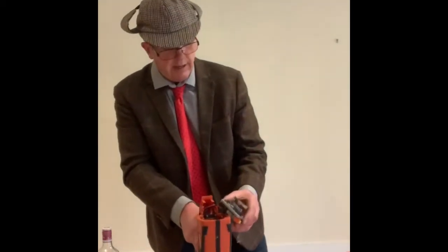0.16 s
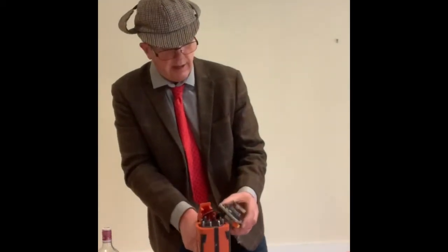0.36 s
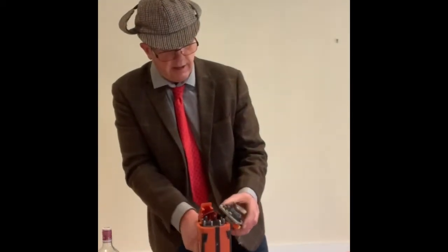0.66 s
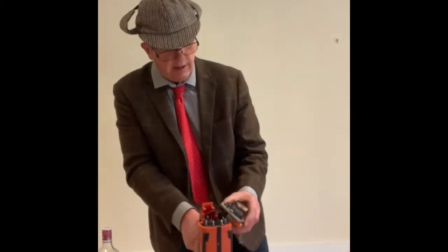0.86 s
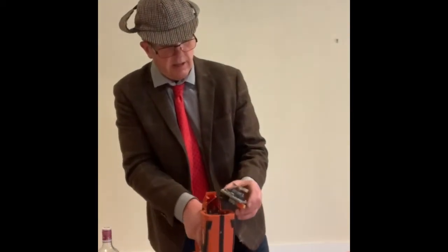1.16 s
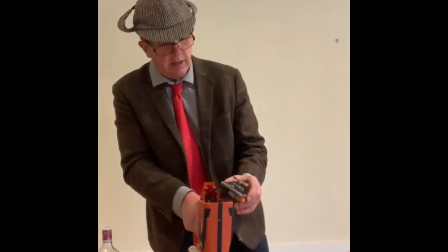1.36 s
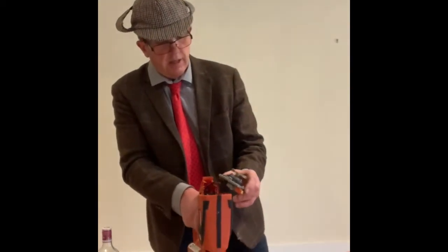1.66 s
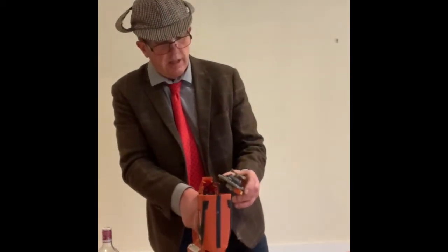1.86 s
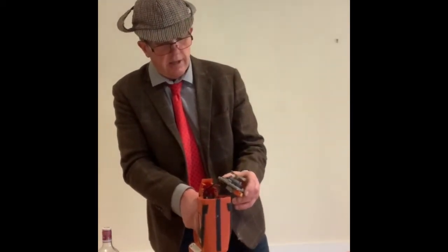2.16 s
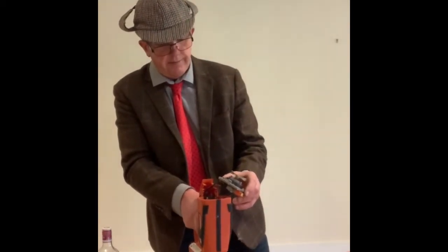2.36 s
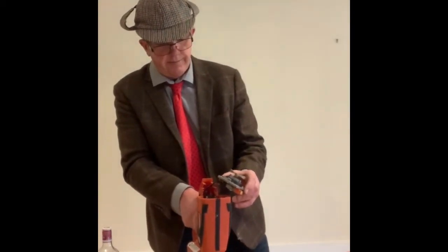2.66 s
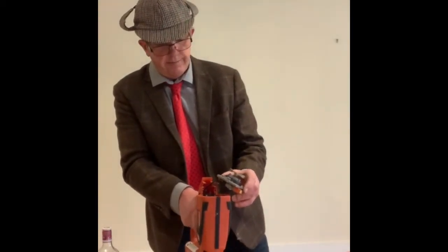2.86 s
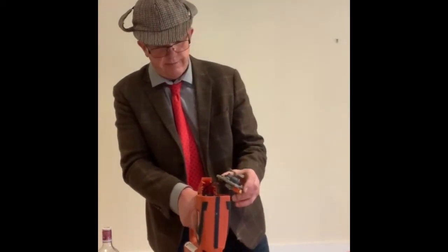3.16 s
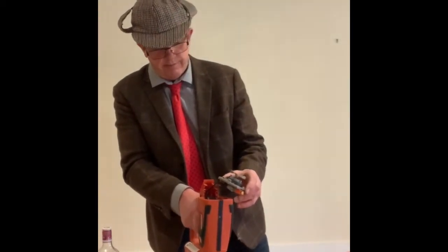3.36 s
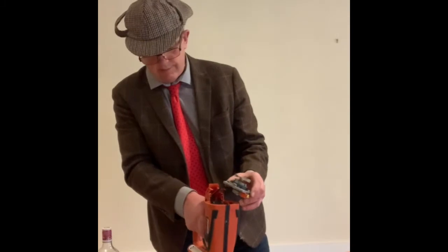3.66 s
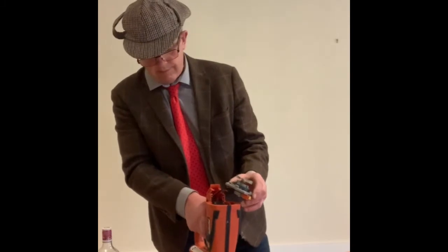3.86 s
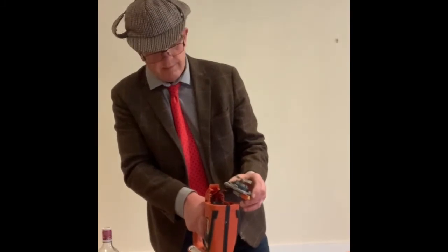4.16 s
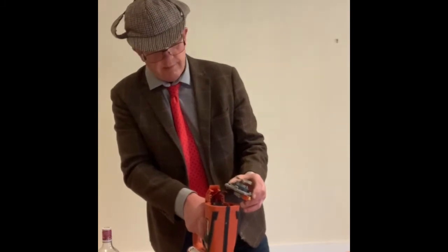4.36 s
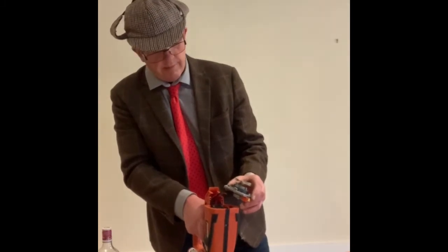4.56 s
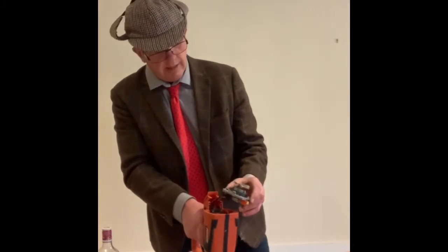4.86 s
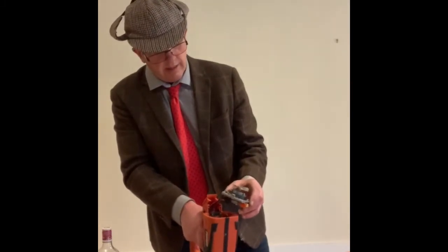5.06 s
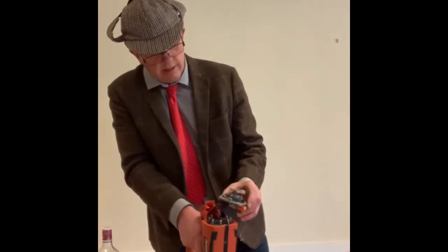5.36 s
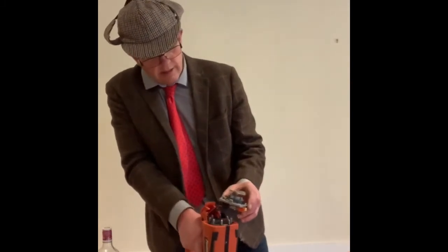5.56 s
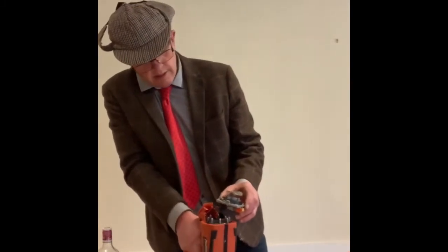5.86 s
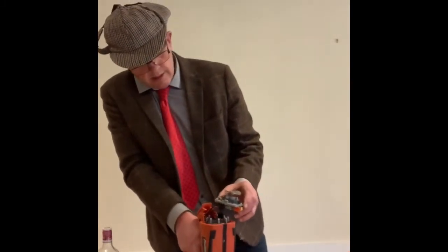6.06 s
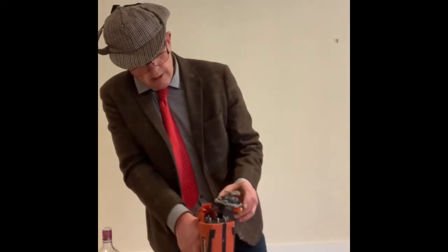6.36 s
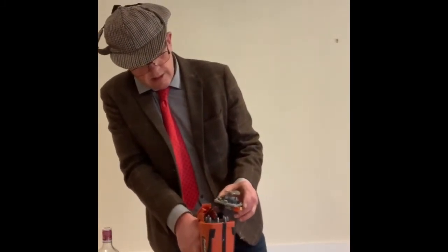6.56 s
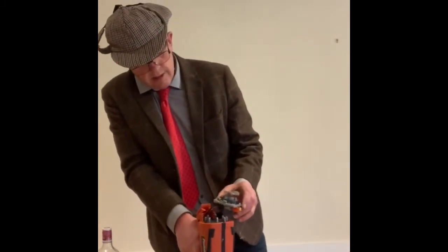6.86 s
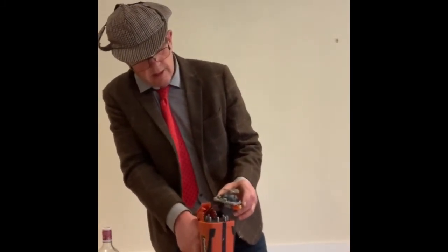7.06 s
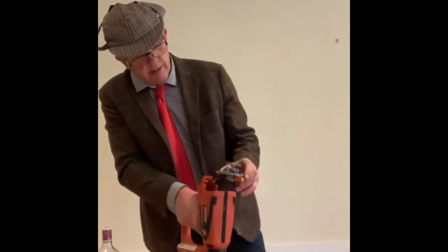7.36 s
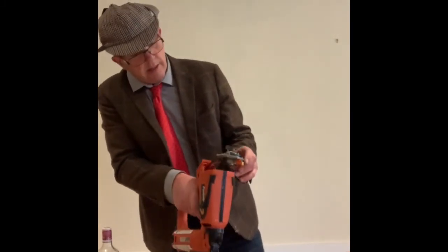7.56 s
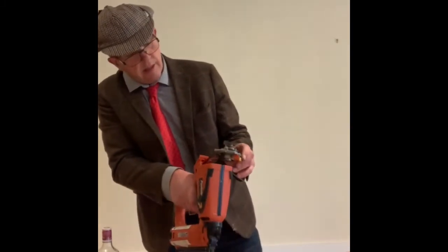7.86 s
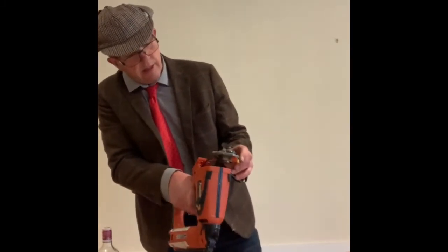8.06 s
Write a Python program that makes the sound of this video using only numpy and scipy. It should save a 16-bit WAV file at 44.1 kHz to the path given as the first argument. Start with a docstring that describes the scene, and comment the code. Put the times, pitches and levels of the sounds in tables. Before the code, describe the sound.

A gas nail gun's small fan is already at full speed: a steady blade tone near 790 Hz, thin higher whines and a bright hissing air rush, slightly wavering. Handling scrapes start immediately; at 0.25 s a heavy, dull floor thump lands with a sharp crack. A smaller clatter of clicks comes around 1.0 s and one short tick at 2.0 s. At 4.0 s power drops: the pitch glides down and the air darkens and fades, while dry, scratchy bearing rubbing surfaces until about 4.7 s. A click at 4.95 s and thumps, scrapes and knocks from 5.1 to 5.4 s break the near quiet. At 5.4 s the motor climbs rapidly, settling by about 6 s into the same whine. Scrapes near 7 s lead to a tight, sharp click cluster at 7.15 s; the fan continues to the end, around 8 s. Bare room, light reverberation, soft hiss, close stereo leaning right.

```python
"""The four-blade fan motor of a gas nail gun whines in a bare room: shaft orders in a rush of air through the housing.
Scrapes, floor thumps and tool clicks from the first moments on; after 4 s the fan coasts and a dry bearing shows.
Handling returns near 5 s and again near 7 s; in between, at 5.4 s, the motor spins up again.
Sines make the orders, shaped noise the air and rubbing, rung modes the blows; two microphones hear it from the right.
"""
import sys
import numpy as np
from scipy import signal
from scipy.fft import rfft, irfft, next_fast_len
from scipy.io import wavfile

SR = 44100
rng = np.random.default_rng(int(sys.argv[2]) if len(sys.argv) > 2 else 0)


def materialize(psi):
    """Save the field psi as 16-bit PCM at rate SR to the path in sys.argv[1].

    A 1-D psi becomes a single channel; in a 2-D psi each row is a channel.
    """
    bounded = np.clip(np.atleast_2d(psi).T, -1, 1)
    quanta = np.round(bounded * 32767).astype(np.int16)
    wavfile.write(sys.argv[1], SR, quanta)


N = 361619

FULL_HZ, SECOND_HZ = 197.6, 196.9  # shaft speed before the coast and after the spin-up
# Housing resonances. Each row: centre in Hz, width in Hz, lift in dB.
HOUSING_MODES = [(1125, 80, 16), (1600, 200, 7), (1850, 200, 10), (7690, 470, 4.5)]


def gain_of(db):
    """dB to gain."""
    return 10 ** (np.asarray(db) / 20)


def evened(x):
    """Scales to rms 1."""
    return x / np.sqrt(np.mean(x ** 2) + 1e-20)


def read(points, hz):
    """Reads a spectrum table on a log-frequency axis."""
    f, value = np.transpose(points)
    return np.interp(np.log(hz + 1), np.log(f + 1), value)


def read_linear(points, x):
    """Reads a two-column table on a linear axis."""
    return np.interp(x, *np.transpose(points))


def humps_db(modes, hz):
    """Resonant lift in dB of (Hz, width in Hz, dB) modes."""
    return sum(db / (1 + (2 * (hz - f) / width) ** 2) for f, width, db in modes)


def add(mix, s, sound):
    """Mixes a sound in at s seconds."""
    part = mix[:, round(s * SR):][:, :sound.shape[1]]
    part += sound[:, :part.shape[1]]


def drift(x, rate):
    """Random wander of rms 1 along x: sines of up to rate cycles per unit of x, the slow ones strongest."""
    return evened(sum(np.sin(2 * np.pi * (f * x + rng.random())) / np.sqrt(f)
                      for f in np.geomspace(rate / 20, rate, 12)))


def coarse_drift(t, rate_hz):
    """Drift computed at every 64th sample and interpolated."""
    return np.interp(t, t[::64], drift(t[::64], rate_hz))


def noise(length, db_of, size=1024):
    """Two unrelated noises whose short-time spectra follow db_of(Hz column, s row)."""
    frames = 4 * length // size + 5
    hz = np.fft.rfftfreq(size, 1 / SR)[:, None]
    a, b = rng.standard_normal((frames, len(hz), 2, 2)).T
    z = (a + 1j * b) * gain_of(db_of(hz, np.arange(frames) * size / 4 / SR))
    return signal.istft(z, nperseg=size, noverlap=3 * size // 4)[1][:, :length]


def microphones(pair):
    """The right leads; left-right likeness varies from band to band."""
    # Each row: Hz, left-right likeness from 0 to 1.
    likeness = [(100, 0.94), (1000, 0.97), (1500, 0.92), (2400, 0.021), (3400, 0.72), (4000, 1), (4900, 1),
                (5500, 0.78), (6500, 0.39), (7600, 0.94), (8600, .999), (9700, 0.95), (10700, 0.68),
                (11900, .999), (13800, .999), (15000, 0.44)]
    # Each row: Hz, phase in radians by which left leads.
    left_lead_rad = [(0, 0), (350, -.1), (780, -.9), (1640, -.5), (2400, -2.1), (3800, -np.pi),
                     (5000, -np.pi), (7600, -2 * np.pi), (9600, -2 * np.pi), (11700, -3 * np.pi),
                     (14000, -3 * np.pi), (16000, -4 * np.pi)]
    # Each row: Hz, left minus right in dB.
    tilt_db = [(300, 2), (3400, -2.5), (4300, 0)]
    size = next_fast_len(N + 4096)
    hz = np.fft.rfftfreq(size, 1 / SR)
    same = np.clip(read(likeness, hz), 0, 1)
    side = np.array([[.5], [-.5]])
    a, b = rfft(pair, size)
    ports = np.exp(1j * side * read_linear(left_lead_rad, hz)) * gain_of(side * read(tilt_db, hz))
    right = same * a + np.sqrt(1 - same ** 2) * b
    return irfft(np.array([a, right]) * ports, size)[:, :N]


def shaft_hz(t):
    """Full speed, a coast in which drag eats the speed, then steady torque against rising drag."""
    off_s, coast_s = 4.0, 0.765  # power drops; time constant of the coast
    on_s, spin_up_s = 5.377, 0.21  # power returns; time constant of the climb
    coast = FULL_HZ * np.exp(-(np.clip(t, off_s, on_s) - off_s) / coast_s)
    climb = np.tanh(np.arctanh(np.minimum(coast / SECOND_HZ, .99)) + (t - on_s) / spin_up_s)
    return np.where(t < on_s, coast, SECOND_HZ * climb)


def log_speed(t):
    """Decades of shaft speed relative to full speed."""
    return np.log10(shaft_hz(t) / FULL_HZ)


def tone(turns):
    """A sine and its quarter-cycle twin, each of rms 1."""
    return np.sqrt(2) * np.array([np.sin(2 * np.pi * turns), np.cos(2 * np.pi * turns)])


def blade(t, hz, turns):
    """The blade tone meets its echoes from the walls, so a glide runs through a row of dips."""
    # Level for full speed, without echoes. Each row: time in seconds, level in dB.
    level_rows = [(0, -49), (.5, -56), (1.1, -51.5), (2.15, -54), (2.65, -54), (3.05, -52.5), (3.43, -54.5),
                  (3.53, -62), (3.68, -64), (3.73, -78), (3.8, -63), (3.95, -65), (4.0, -80), (4.04, -52.5),
                  (5.76, -54.5), (5.88, -61.5), (6.1, -56), (7.9, -53.5), (7.99, -60), (8.1, -56.5)]
    # Wall echoes. Each row: delay in seconds, level in dB.
    wall_rows = [(0.0213, -7), (0.0347, -9)]
    # Side it is heard on. Each row: time in seconds, left minus right in dB, on top of the microphones.
    pan_rows = [(0, -1.5), (3.4, -3.5), (3.6, 12), (4.2, -3), (6, 1), (8.2, 5)]
    db_per_decade, waver_db = 83, 1.5
    db = read_linear(level_rows, t) + db_per_decade * np.log10(hz / FULL_HZ)
    db += waver_db * coarse_drift(t, rate_hz=12)
    # an echo lags by the turns made during its delay
    echoes = sum(gain_of(wall_db) * tone(4 * (turns - shaft_hz(t - s / 2) * s)) for s, wall_db in wall_rows)
    heard = gain_of(db) * microphones(tone(4 * turns) + echoes)
    return heard * gain_of(np.outer([.5, -.5], read_linear(pan_rows, t)))


def whine(t, hz, turns):
    """Shaft orders weaken as the speed drops, the high ones most, and lift at the housing resonances."""
    # Orders that swell and fade, each in its own way.
    # Each row: time in seconds, then the 6th, 8th, 12th and 39th order in dB.
    swelling_rows = [(0.55, -75, -79, -69, -74), (0.85, -82, -79, -71, -71), (1.3, -74, -66, -67, -74),
                     (1.65, -81, -76, -72, -72), (2.1, -81, -73, -70, -72), (2.45, -73, -66, -82, -66),
                     (2.8, -74, -70, -80, -70), (3.15, -78, -68, -72, -83), (3.5, -71, -69, -74, -79),
                     (3.85, -71, -66, -72, -77), (6.0, -68, -61, -86, -66), (6.35, -69, -70, -86, -67),
                     (6.7, -69, -67, -75, -64), (6.98, -67, -69, -74, -71), (7.4, -72, -64, -73, -79),
                     (7.7, -73, -74, -69, -70), (8.05, -73, -78, -63, -76)]
    # Other orders at full speed. Each row: multiple of the shaft speed, level in dB.
    steady_rows = [(1, -81.5), (5, -74.5), (7, -86), (16, -71.5), (17, -71.5), (20, -64.5), (22, -68.5),
                   (27, -69.5), (28, -72), (32, -74.5)]
    # The 9th order swells after 7 s, then fades a little. Each row: time in seconds, level in dB.
    ninth_rows = [(7.0, -85), (7.4, -75), (8.05, -80)]
    odd_lift_db = 13  # 7th and 9th stand out while the speed changes
    coarse, coarse_hz = t[::64], hz[::64]
    slowing = np.log10(coarse_hz / FULL_HZ)
    gliding = np.clip(-60 * slowing - .2, 0, 1)
    s, *swelling = np.transpose(swelling_rows)
    # (order, level dB, waver dB)
    levels = [(k, np.interp(coarse, s, db), 2.5) for k, db in zip((6, 8, 12, 39), swelling)]
    levels += [(9, read_linear(ninth_rows, coarse), 2.5)]
    levels += [(k, db, 2.5 if k < 12 else 5) for k, db in steady_rows]
    out = np.zeros(N)
    for k, db, waver_db in levels:
        lift_db = humps_db(HOUSING_MODES, k * coarse_hz) - humps_db(HOUSING_MODES, k * FULL_HZ)
        lift_db += odd_lift_db * gliding * (k in (7, 9))
        # a gliding tone runs through the peaks and dips of the room: drift along pitch
        lift_db += gliding * (7 * np.clip(drift(k * coarse_hz, rate=.3), -2.5, 1) - 4)
        speed_db = (40 + .3 * k ** 2) * slowing
        size = gain_of(db + speed_db + lift_db + waver_db * drift(coarse, rate=22))
        out += np.interp(t, coarse, size) * np.sqrt(2) * np.sin(2 * np.pi * (k * turns + rng.random()))
    return out


def air_rush(t, turns):
    """Noise of air through the housing throbs once a turn; slower blades stir less treble."""
    # Spectrum at full speed, before the housing resonances. Each row: Hz, dB.
    spectrum = [(1800, -26.5), (2600, -10.5), (3300, -1), (4300, 3.5), (5500, 1.5), (6500, -2.5),
                (9000, -5), (10500, -9.5), (12500, -15.5), (15700, -10.5)]
    level_db, bend_db = -53.5, -125  # at full speed; per squared decade, so its fall steepens
    flutter_db = 6  # unevenness per decade of lost speed

    def colour_db(f, u):
        slowing = log_speed(u)
        db = read(spectrum, f) + humps_db(HOUSING_MODES, f) - 40 * (f < 1800)
        db = db - 9 * slowing * np.log2(7000 / (f + 1))
        return db + 160 * np.maximum(slowing, -.12) * np.clip(np.log2((f + 1) / 7000), 0, .5)

    air = noise(N, colour_db)
    slowing = log_speed(t)
    db = level_db + bend_db * slowing ** 2
    db += flutter_db * slowing * coarse_drift(t, rate_hz=30)
    throb = 1 + 0.078 * np.cos(2 * np.pi * turns)
    return gain_of(db) * air / np.std(air[:, :SR]) * throb


def blade_wake():
    """Turbulence shed by the blades: noise whose spectrum slides down and weakens with the speed."""
    # Spectrum at full speed. Each row: Hz, dB.
    spectrum = [(120, -3), (300, -18), (500, -16.5), (750, 2.5), (1100, -3), (1550, 3.5), (2100, -1),
                (3000, 2.5), (4000, -20.5)]
    level_db, db_per_decade = -66, 44
    shed = noise(N, lambda f, u: read(spectrum, f / 10 ** log_speed(u))
                 + db_per_decade * log_speed(u) - 60 * (f > 4000))
    return gain_of(level_db) * shed / np.std(shed[:, :SR])


def quiet_floor():
    """Steady noise for room tone and microphone hiss."""
    # Each row: Hz, dB.
    spectrum = [(60, 4), (130, -4), (250, -2.5), (450, -5.5), (1100, -16.5), (2000, -13.5), (4000, -58),
                (9000, -27.5), (15000, -29.5)]
    return gain_of(-77) * evened(noise(N, lambda f, u: read(spectrum, f), size=2048))


def scrape(start_s, loudest_s, end_s, db, rumble_db):
    """Hands shifting on the tool: grainy rubbing noise that swells and fades."""
    # Each row: Hz, dB.
    spectrum = [(60, -4.5), (170, 7.5), (400, -15.5), (900, 1), (1700, -4), (2600, -9), (4000, -4.5),
                (9000, -26)]
    t = np.arange(start_s, end_s, 1 / SR)
    grain = gain_of(2.2 * drift(t, rate=120))
    swell = np.interp(t, [start_s, loudest_s, end_s], [0, 1, 0]) ** 1.66
    rub = noise(len(t), lambda f, u: read(spectrum, f) + rumble_db * (f < 300), size=512)
    return gain_of(db) * evened(rub) * grain * swell


def thump(db, centre_hz):
    """A soft blow rings the floor modes nearest its centre; the low ones last longer."""
    # Floor modes. Each row: Hz before a random detune, level in dB.
    floor_modes = [(58, 4.5), (80, 1), (100, 0.5), (128, 2), (158, 0), (188, 3), (213, -3.5), (283, 1),
                   (346, -2.5), (420, -5.5), (515, -0.5)]
    t60_s = 0.28  # at 190 Hz
    t = np.arange(SR // 2) / SR
    hz, mode_db = np.transpose(floor_modes)[:, :, None]
    start_db = mode_db - 18 * abs(np.log2(hz / centre_hz))
    decay_db = 60 * t / (t60_s * (190 / hz) ** 0.23)
    detune = rng.uniform(.96, 1.04, hz.shape)
    phase = rng.uniform(-.12, .12, hz.shape)  # cycles
    ring = (gain_of(start_db - decay_db) * np.sin(2 * np.pi * (hz * detune * t + phase))).sum(0)
    ring *= 1 - np.exp(-(t / 0.003) ** 2)  # soft onset
    return gain_of(db) * np.tile(ring, (2, 1)) / np.sqrt(2 * np.sum(gain_of(start_db) ** 2))


def click(db, low_db, mid_db, high_db, top_db, rattle_s):
    """A crack and a few rebounds ring the tool body over a puff of noise, then the tail in the room."""
    # Tool-body modes. Each row: centre in Hz, width in Hz, lift in dB.
    body_modes = [(892, 110, 9), (1703, 460, 8.5), (3290, 480, 6), (3680, 300, 6), (7860, 900, 0.5)]
    # Each row: Hz, reverberation t60 in seconds.
    room_t60 = [(200, 0.72), (1000, 0.22), (3000, 0.29), (8000, 0.23), (15000, 0.095)]
    impacts_per_s, clatter_db = 2200, 3
    t = np.arange(SR // 3) / SR
    colour = [(200, low_db - 32.5), (650, low_db), (1050, low_db), (1500, mid_db), (2400, mid_db),
              (3800, 0), (6000, high_db), (9500, high_db), (12000, top_db)]

    def body_db(f):
        return read(colour, f) + humps_db(body_modes, f)

    clatter = gain_of(clatter_db * np.clip(drift(t, rate=1600), -2, 2))
    rattle = clatter * np.exp(-t / rattle_s)
    puff = noise(len(t), lambda f, u: body_db(f), size=256) * rattle * np.minimum(t / .0014, 1)

    when, sign = rng.random((len(t), 2)).T
    impacts = (when < impacts_per_s / SR) * np.sign(sign - .5) * rattle
    impacts[20] = 1  # the crack
    # minimum phase: the body rings only after the blow
    cepstrum = irfft(np.log(gain_of(body_db(np.fft.rfftfreq(2048, 1 / SR)))))
    cepstrum[1:1024] *= 2
    cepstrum[1025:] = 0
    body_ring = irfft(np.exp(rfft(cepstrum)))
    crack = signal.hilbert(signal.oaconvolve(impacts, body_ring)[:len(t)])
    crack_pair = np.array([crack.real, crack.imag]) / np.linalg.norm(crack.real)
    burst = 0.6 * crack_pair + 0.69 * puff / np.linalg.norm(puff[0])

    tail = noise(len(t), lambda f, u: body_db(f) - 60 * u / read(room_t60, f), size=256)
    tail_gain = gain_of(-10.5) * (rattle_s / 0.0053) ** 0.76
    tail = tail_gain * tail / np.std(tail[:, :800]) * (1 - np.exp(-t / 0.0031))
    return gain_of(db) * (burst * np.sqrt(rattle_s * SR / 2) + tail * np.sqrt(clatter))


def bearing():
    """Rough rubbing of the dry bearing rings fixed modes of the housing, uncovered as the fan coasts."""
    # Each row: Hz, lift in dB.
    mode_rows = [(1110, 8.5), (1520, 5.5), (4280, 33.5), (5100, 11.5), (7600, 20), (8800, 11),
                 (15500, 15.5)]
    # Level with a few scuffs. Each row: time in seconds, dB.
    level_rows = [(3.95, -67), (4.12, -61.5), (4.25, -59), (4.29, -71), (4.37, -56), (4.47, -76.5),
                  (4.52, -72), (4.58, -68), (4.66, -77), (4.8, -79), (4.92, -88), (5.4, -89)]
    t = np.arange(N) / SR
    modes = [(hz, max(hz / 30, 130), db) for hz, db in mode_rows]
    rub = noise(N, lambda f, u: humps_db(modes, f) - 3.3 * np.log2(1 + f / 3000) - 30 * (f < 700), size=512)
    level_db = np.interp(t, *np.transpose(level_rows), left=-140, right=-140)
    return gain_of(level_db) * evened(rub)


def fan():
    """Blade tone, whine, air rush, wake and bearing on one slightly unsteady shaft."""
    t = np.arange(N) / SR
    hz = shaft_hz(t)
    turns = np.cumsum(hz * (1 + 0.000923 * coarse_drift(t, rate_hz=9))) / SR
    body = whine(t, hz, turns) + air_rush(t, turns) + blade_wake() + bearing()
    return blade(t, hz, turns) + microphones(body)


def handling():
    """Places the scrapes, thumps and clicks of the handled tool."""
    # Each row: start, loudest and end in seconds, level in dB, extra rumble under 300 Hz in dB.
    scrape_rows = [(0, 0.043, 0.23, -54, 1), (0.161, 0.248, 0.42, -43.5, 1),
                   (0.759, 0.927, 1.08, -56.5, 15), (0.94, 1.04, 1.24, -53, 0), (5.099, 5.236, 6, -57, 2),
                   (5.26, 5.3, 5.4, -57, 0), (6.94, 6.978, 7.03, -59.5, -0.5),
                   (7.0, 7.085, 7.15, -57.5, 14), (7.07, 7.167, 7.3, -52, -3)]
    # Each row: start in seconds, level in dB, centre in Hz.
    thump_rows = [(0.009, -38, 198.5), (0.155, -31, 190), (0.253, -13.5, 221), (0.283, -34, 197),
                  (0.35, -35.5, 280), (1.035, -38.5, 129), (1.096, -47, 146), (4.95, -45.5, 155),
                  (4.963, -41.5, 151), (5.133, -43, 192), (5.164, -49, 203), (5.223, -27, 189),
                  (5.334, -22, 226), (5.359, -27.5, 225), (5.399, -31.5, 211), (5.438, -43, 131),
                  (5.773, -53, 171), (5.86, -56, 185), (7.158, -34, 165), (7.165, -42, 420)]
    # Each row: start in seconds, level in dB, then 600-1100 Hz, 1.5-2.5 kHz, 5-10 kHz and above 11 kHz
    # in dB relative to 3-5 kHz, rattle time in seconds.
    click_rows = [(0.244, -25.5, -0.5, -4.5, -2.5, -11.5, 0.0059), (0.250, -31.5, 5, 5, -15, -16, 0.0043),
                  (0.984, -48.5, 15.5, 4, -7, -20, .006), (1.022, -45, 8, -1, 2, 2, .005),
                  (1.035, -28.5, 9.5, 2.5, 6, 9, 0.0084), (1.050, -34.5, -3, 8, 2, 3, .004),
                  (1.991, -33, 0, 13, -14, -20, .0014), (5.202, -43, 0, 4, 3, -6, .002),
                  (4.947, -36.5, -12, -3, 0.5, -1, 0.0037), (5.123, -52.5, 1, -4, -2.5, -29, 0.0054),
                  (5.133, -52, 27, 19, -10, -25, 0.0057), (5.215, -47.5, 31, 22, -11, -20, 0.0076),
                  (5.283, -52.5, 0, 4, -20, -27, 0.0045), (5.329, -32.5, 11.5, 3.5, -5, -17, 0.0069),
                  (7.121, -46, -2, 14, -8, -20, .004), (7.152, -28, 7.5, -5, 3.5, -11, 0.0045),
                  (7.157, -26, 0, 4, 3, 7.5, 0.0068), (7.164, -29.5, -4, 7, -6, 3, 0.0045)]
    mix = np.zeros((2, N))
    for row in scrape_rows:
        add(mix, row[0], scrape(*row))
    for s, *row in thump_rows:
        add(mix, s, thump(*row))
    for s, *row in click_rows:
        add(mix, s, click(*row))
    return mix


def scene():
    """Fan, handling and the quiet floor."""
    return fan() + microphones(handling()) + quiet_floor()


def record(dry):
    """The microphones lose the deepest bass; then the band limit."""
    thinned = signal.sosfilt(signal.butter(3, 45, "high", fs=SR, output="sos"), dry)
    band_limit = signal.firwin(511, 15950, window=("kaiser", 9), fs=SR)
    return signal.oaconvolve(thinned, band_limit[None], "same")


dry = scene()
out = record(dry)
materialize(out)
```